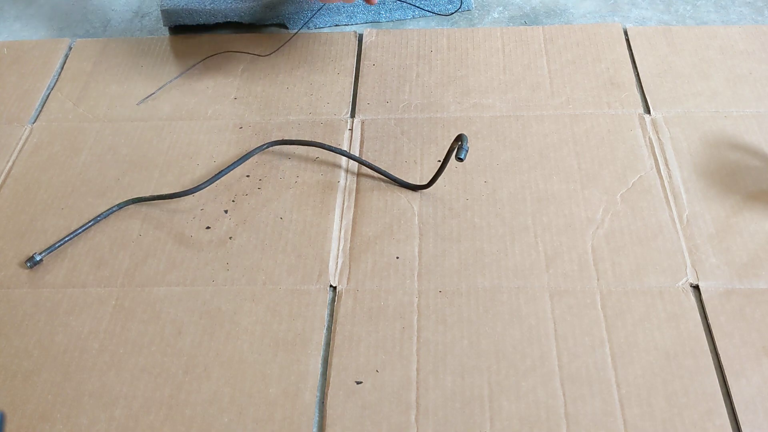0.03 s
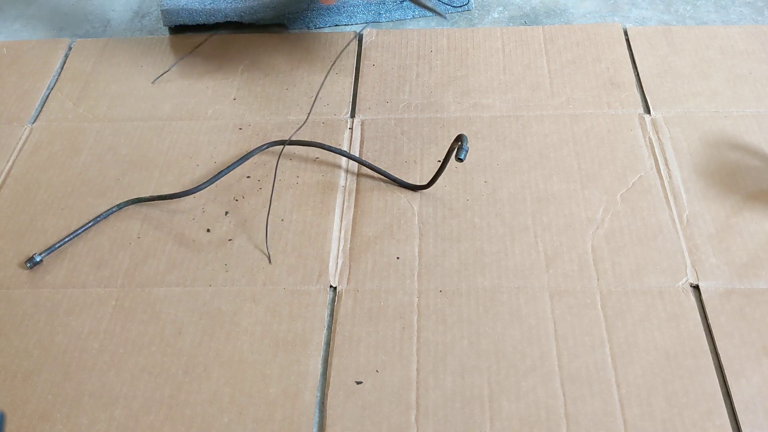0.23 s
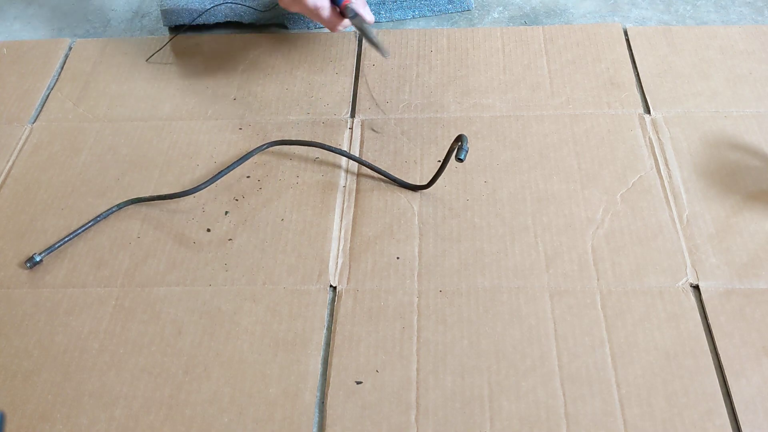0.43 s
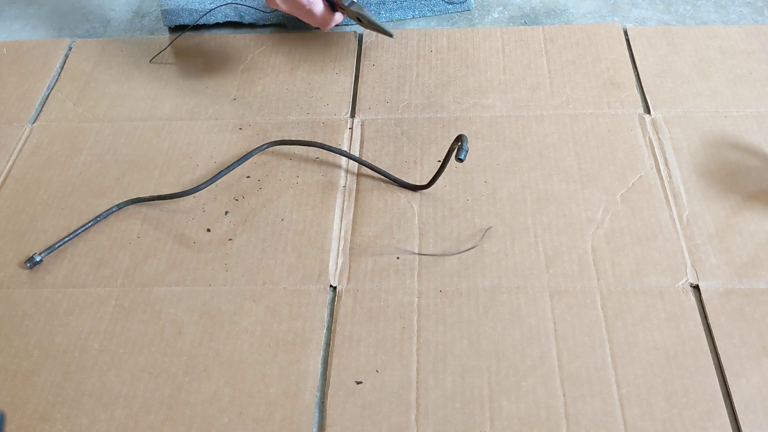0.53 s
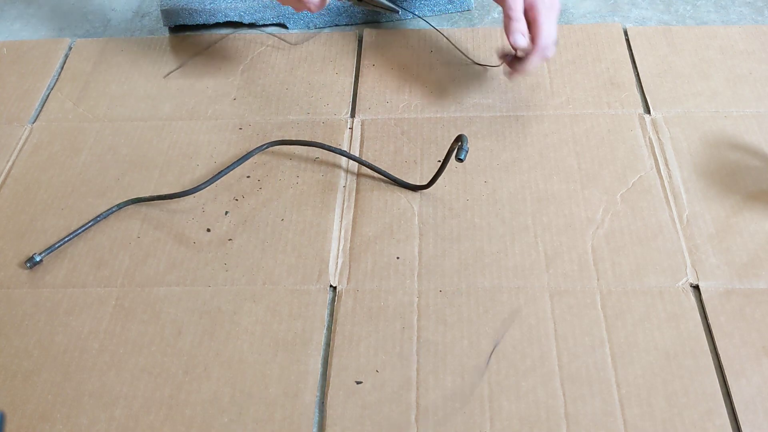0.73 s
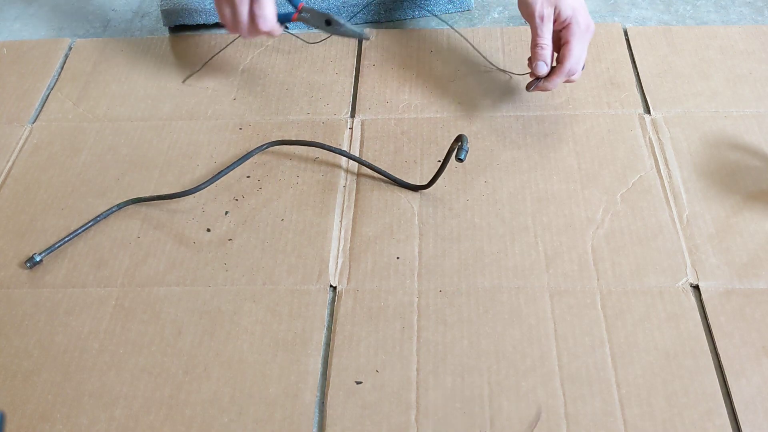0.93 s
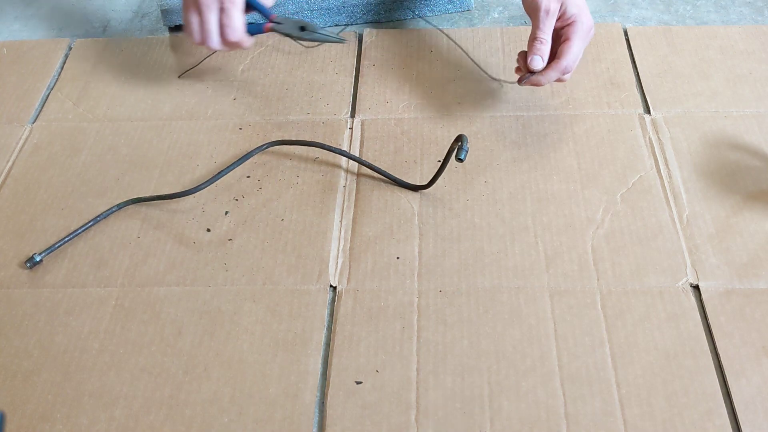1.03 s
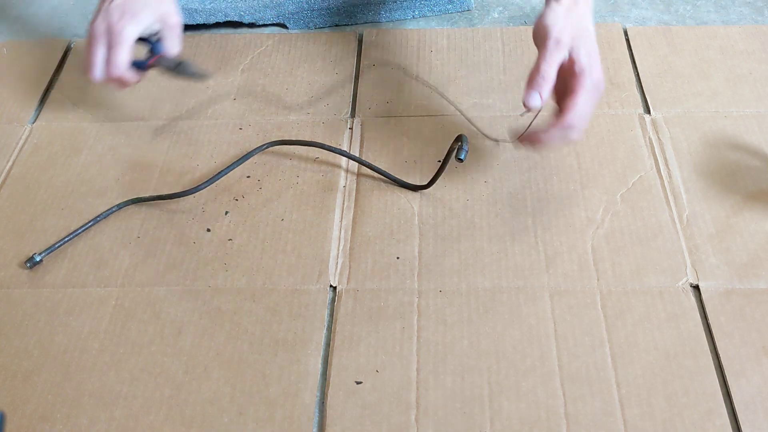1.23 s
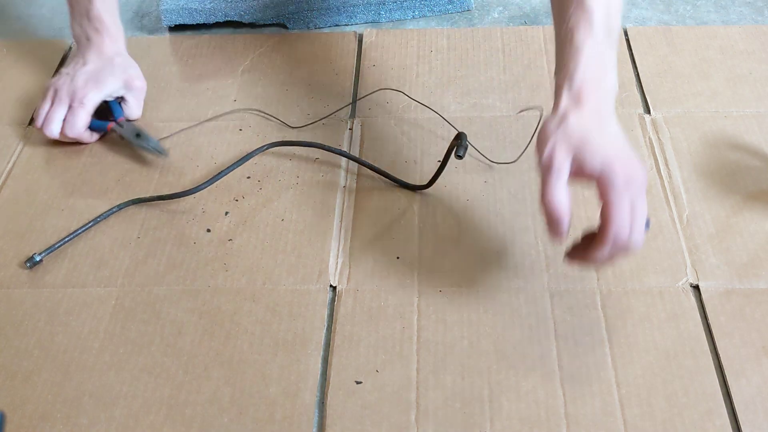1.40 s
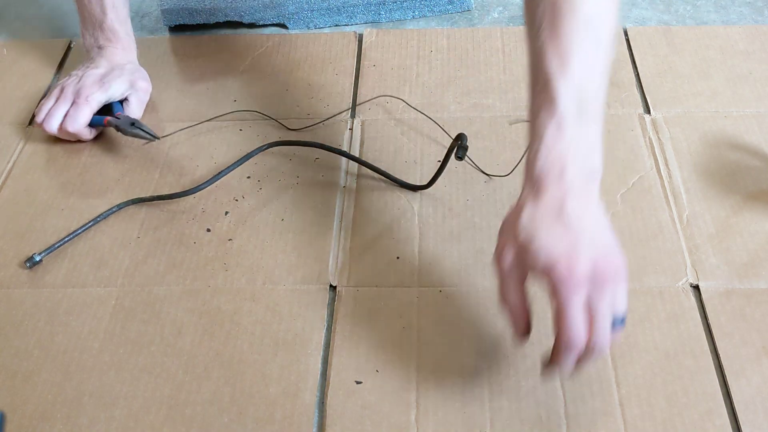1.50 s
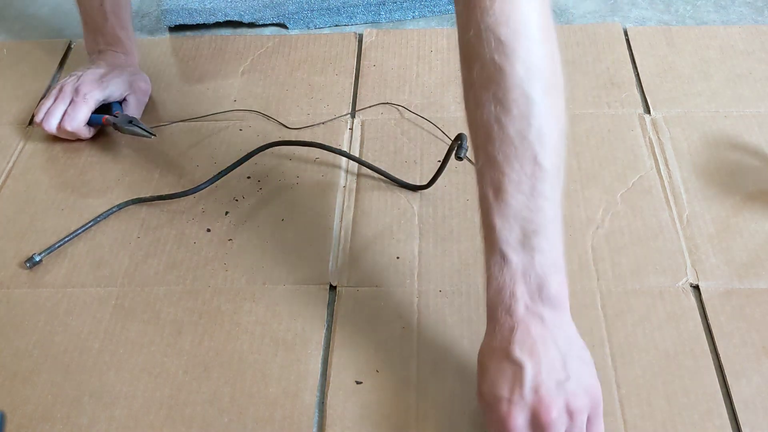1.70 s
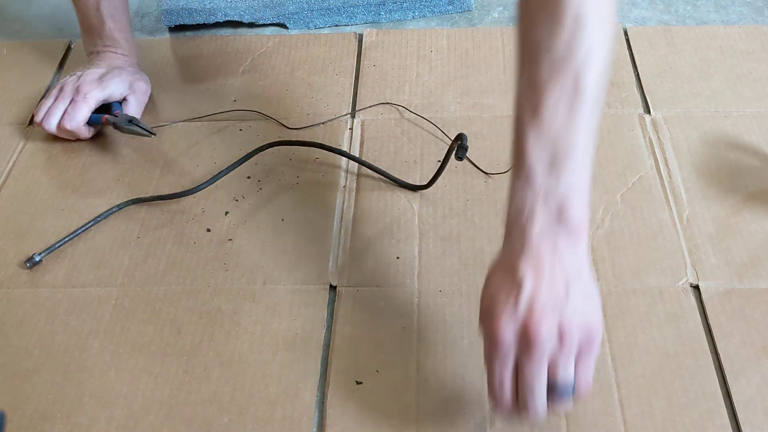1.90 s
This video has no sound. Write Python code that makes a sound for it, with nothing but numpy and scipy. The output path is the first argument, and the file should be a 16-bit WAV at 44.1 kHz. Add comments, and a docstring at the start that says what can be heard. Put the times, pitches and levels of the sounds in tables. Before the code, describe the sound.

Pliers snip thin wire with sharp snaps, then the wire chatters on cardboard.

```python
"""Pliers cutting steel wire

Pliers snap through thin steel wire over a sheet of cardboard, and the jaws and cardboard ring.
The loose wire pings, scrapes along the jaws and chatters on the cardboard as it is laid down.
Hands and sleeves rustle, weight shifts on the floor, and the hard workshop echoes over a faint hum."""
import sys
import numpy as np
from scipy import signal
from scipy.fft import rfft, irfft, next_fast_len
from scipy.io import wavfile

SR = 44100
rng = np.random.default_rng(int(sys.argv[2]) if len(sys.argv) > 2 else 0)


def output_pcm(signal):
    """Save a mono or channel-first signal as 16-bit PCM at the path in sys.argv[1].

    Samples are clipped to [-1, 1] before scaling.
    """
    pcm = np.clip(np.atleast_2d(signal).T, -1, 1) * 32767
    wavfile.write(sys.argv[1], SR, np.round(pcm).astype(np.int16))


N = 85995
T = np.arange(SR // 2) / SR  # half a second of time for one short sound


def amp(db):
    return 10 ** (np.asarray(db) / 20)


def unit(x):
    return x / np.sqrt(np.mean(x ** 2) + 1e-20)


def along(points, hz):
    """Read between (Hz, value) points on a log frequency scale."""
    freqs, values = np.transpose(points)
    return np.interp(np.log(hz + 1), np.log(freqs + 1), values)


def curve(rows):
    """A gain for every sample, from (seconds, dB) rows."""
    return amp(np.interp(np.arange(N) / SR, *np.transpose(rows)))


def swell(length):
    """A rounded rise and fall."""
    return np.sin(np.pi * np.clip(T / length, 0, 1))


def pan(db):
    """Make the left side db louder than the right."""
    return amp(np.array([[db], [-db]]) / 2)


def add(out, start, x):
    """Mix x in at start seconds."""
    i = max(0, round(start * SR))
    out[:, i:i + x.shape[-1]] += x[..., :N - i]


def filtered(x, gain):
    """Turn each frequency up or down by gain(hz)."""
    size = x.shape[-1]
    padded = next_fast_len(size + 8192)
    return irfft(rfft(x, padded) * gain(np.fft.rfftfreq(padded, 1 / SR)), padded)[..., :size]


# Each row: frequency in Hz, how alike left and right are (1 means the same).
STEREO_LIKENESS = [(100, 0.87), (500, 0.73), (1200, 0.72), (2200, 0.063), (5000, -0.32), (15000, -0.15)]
def noise(size, colour=None):
    """Stereo noise, nearly mono in the bass; a colour says how strong each frequency is."""
    def gain(hz):
        angle = np.arccos(np.clip(along(STEREO_LIKENESS, hz), -1, 1)) / 2
        return np.array([np.cos(angle), np.sin(angle)]) * (amp(along(colour, hz)) if colour else 1)
    mid, side = filtered(rng.standard_normal((2, size)), gain)
    return unit(np.array([mid + side, mid - side]))


def friction(size, colour, rate, depth_db, pitch=1):
    """Rubbing makes noise whose level jumps from slip to slip, rate times a second."""
    slips = np.interp(np.arange(size) * rate / SR, np.arange(size), rng.standard_normal(size))
    rough = noise(size) * amp(depth_db * slips)
    return unit(filtered(rough, lambda hz: amp(along(colour, hz / pitch))))


def contact(colour, thud_db, bright_db, scatter_db, t60, lag_s=0, pitch=1):
    """A sharp push, its echo off the floor and a scatter of noise that fades 60 dB in t60 seconds."""
    size = 2048
    hz = np.fft.rfftfreq(size, 1 / SR)
    bass = 1 / (1 + (hz / 950) ** 4)
    treble = 1 - 1 / (1 + (hz / 2300) ** 4)
    db = along(colour, hz / pitch) + thud_db * bass + bright_db * treble
    # Build a click of this colour with its energy right at the start (minimum phase).
    cepstrum = irfft(db * np.log(10) / 20)
    cepstrum[1:size // 2] *= 2
    cepstrum[size // 2 + 1:] = 0
    click = irfft(np.exp(rfft(cepstrum)))
    t = T[:2 * size]
    push = noise(len(t)) * amp(-60 * t / t60) * (1 - np.exp(-t / 0.00073))
    push *= amp(scatter_db) / np.sqrt(np.sum(push ** 2) / 2)
    echo_s = 0.0033 * (1 + 0.03 * rng.uniform(-1.2, 1))
    for ear, delay in enumerate([max(-lag_s, 0), max(lag_s, 0)]):
        push[ear, round(delay * SR)] += 1
        push[ear, round((delay + echo_s) * SR)] += amp(-6.5)
    hit = signal.fftconvolve(push, click[None], axes=1)[:, :len(t)]
    return hit / np.sqrt(np.mean(hit[:, :SR // 100] ** 2))  # the first 10 ms set the level


def ring(modes, spread=0.0036, damping=1, size=len(T)):
    """A struck object's fading tones, a little different each time; damping divides their fade times."""
    hz, db, t60 = np.transpose(modes)[:, :, None]
    louder, detune, phase_gap = rng.standard_normal((3, len(hz), 1))
    t = T[:size]
    fade = amp(db + 4.5 * louder - 60 * damping * t / t60) / np.linalg.norm(amp(db))
    phase = 2 * np.pi * hz * (1 + spread * detune) * t
    ears = [np.sum(fade * np.sin(phase + side * phase_gap / 2), 0) for side in (1, -1)]
    return np.sqrt(2) * np.array(ears)


# The workshop's echo. Each row: frequency in Hz, seconds to fade by 60 dB.
ROOM_FADE = [(100, 0.74), (400, 0.39), (1500, 0.45), (4000, .56), (9000, 0.47), (15000, 0.33)]
def room(x, db):
    """Hard walls add a smooth tail of echoes to the sound, at a level of db."""
    hz, t, spectrum = signal.stft(noise(len(T)), SR, nperseg=256)
    fade = amp(-60 * t / along(ROOM_FADE, hz)[:, None])
    tail = signal.istft(spectrum * fade, SR, nperseg=256)[1]
    tail = tail[:, :len(T)] * (1 - np.exp(-T / 0.0021))
    tail /= np.linalg.norm(tail[0])
    return x + amp(db) * signal.fftconvolve(x, tail, axes=1)[:, :x.shape[1]]


# The colour of the room's air. Each row: frequency in Hz, level in dB.
AIR_COLOUR = [(25, -27), (60, -1.5), (90, -1), (130, -14), (400, -19), (1500, -9), (5000, -37),
              (15000, -30.5)]
# The hum slowly grows. Each row: time in seconds, level in dB.
HUM_LEVEL = [(0, -76), (.7, -72.5), (1.4, -65.5), (1.95, -64)]
def air_and_hum():
    """Quiet room air lies under a faint hum at 91.5 Hz."""
    hum = curve(HUM_LEVEL) * np.sin(2 * np.pi * 91.5 * np.arange(N) / SR)
    return amp(-66) * noise(N, AIR_COLOUR) + hum


# Bumps on the floor. Each row: start in seconds, length in seconds, level in dB, pitch in Hz.
FLOOR_BUMPS = [(0.636, 0.099, -45, 64), (1.48, 0.16, -60, 142)]
# The rumble in a bump. Each row: frequency in Hz, level in dB.
RUMBLE_COLOUR = [(25, -17), (70, 3), (160, 3), (260, -28), (600, -36), (3000, -80)]
def floor_bumps():
    """Weight shifts on the floor, making soft low bumps."""
    out = np.zeros((2, N))
    for start, length, db, hz in FLOOR_BUMPS:
        bump = np.sin(2 * np.pi * hz * T) + amp(-9) * noise(len(T), RUMBLE_COLOUR)
        add(out, start, amp(db) * swell(length) ** 2 * bump)
    return out


# The rustle of hands and sleeves. Each row: time in seconds, level in dB.
SLEEVE_LEVEL = [(0, -48), (.1, -63), (.22, -67.5), (.38, -47), (.46, -60), (.5, -36.5), (.55, -43.5),
                (.6, -69), (.8, -58), (1.08, -47.5), (1.19, -54), (1.26, -47.5), (1.34, -51), (1.44, -41),
                (1.63, -59), (1.7, -47.5), (1.77, -53.5), (1.85, -63), (1.95, -63.5)]
# Quick brushes. Each row: start in seconds, fade time in seconds, level in dB, extra thud in dB.
SLEEVE_BRUSHES = [(1.2244, 0.06, -29, -23), (1.297, .05, -42.5, -0.5), (1.31, .07, -38, 8)]
# The colours of the rustle and of a brush. Each row: frequency in Hz, level in dB.
SLEEVE_COLOUR = [(100, -24), (500, -11.5), (1500, -6), (3500, -1), (7000, -1.5), (10500, -7.5), (14500, -2)]
SLEEVE_BRUSH_COLOUR = [(100, -18), (500, -2.5), (1500, -4.5), (3700, 3), (6000, -0.5), (10000, -5),
                       (14500, -4)]
def hands_and_sleeves():
    """Skin and cloth rub in an uneven rustle, with a few quick brushes."""
    out = curve(SLEEVE_LEVEL) * friction(N, SLEEVE_COLOUR, rate=370, depth_db=6)
    for start, length, db, thud_db in SLEEVE_BRUSHES:
        brush = contact(SLEEVE_BRUSH_COLOUR, thud_db, bright_db=0, scatter_db=30, t60=length)
        add(out, start, amp(db) * brush)
    return room(out, db=-10)


# Wire sliding on cardboard. Each row: time in seconds, level in dB.
SLIDE_LEVEL = [(0, -40.5), (.08, -56.5), (.2, -70), (1.32, -70), (1.38, -40), (1.45, -31.5), (1.55, -41.5),
               (1.7, -45.5), (1.78, -51.5), (1.81, -76), (1.95, -67)]
# Scrapes on the jaws. Each row: start in seconds, length in seconds, level in dB, pitch in Hz.
JAW_SCRAPES = [(0, 0.038, -39.5, 1880), (.416, 0.02, -27, 1560), (.417, .016, -36, 2730),
               (0.472, 0.012, -29.5, 1640), (0.48, 0.016, -24, 1680), (.493, 0.02, -27.5, 1700),
               (0.507, 0.014, -25, 1800), (.52, 0.02, -44, 1730), (0.646, 0.045, -32, 2110),
               (0.784, 0.097, -35, 1700), (0.868, 0.013, -22, 1730), (.886, 0.038, -31, 2400),
               (0.983, 0.058, -49, 1570), (1.115, 0.051, -36.5, 1470), (1.221, 0.038, -43.5, 1440),
               (1.499, 0.024, -32, 1440)]
# The colours of the slide and of a scrape pitched at 1643 Hz. Each row: frequency in Hz, level in dB.
SLIDE_COLOUR = [(40, -52), (180, -16), (400, -25), (800, -6.5), (1200, 0), (1800, -1.5), (2700, -2.5),
                (4000, -17), (9000, -28.5), (15000, -26)]
JAW_SCRAPE_COLOUR = [(100, -83), (400, -43), (900, -29), (1400, -12), (1650, 2), (2000, -12), (2400, -16),
                     (2900, -14), (4500, -36), (10000, -36), (14000, -30)]
def wire_rubbing():
    """The wire drags over the cardboard and scrapes through the jaws."""
    out = curve(SLIDE_LEVEL) * friction(N, SLIDE_COLOUR, rate=400, depth_db=4)
    for start, length, db, hz in JAW_SCRAPES:
        scrape = friction(len(T), JAW_SCRAPE_COLOUR, rate=440, depth_db=-0.5, pitch=hz / 1643)
        add(out, start, amp(db) * swell(length) * scrape)
    return room(out, db=-10)


# Taps. Each row: start in seconds, level in dB, extra thud in dB, extra treble in dB, pitch in Hz.
WIRE_TAPS = [(.003, -36.5, -14, 2, 1550), (.06, -50, 8, 23, 1360), (0.122, -50.5, -7, 2, 1410),
             (.305, -21, -5, -3, 1540), (.855, -27, 8, 10.5, 1560), (0.8654, -20, 4, 0.5, 1686),
             (0.96, -26, -8.5, 2, 1450), (.967, -30.5, 1, 11.5, 1484), (1.12, -42.5, -4, 5, 1570),
             (1.131, -42, 12.5, -10, 1500), (1.34, -31, -9, 2, 1450), (1.347, -32.5, -2, -1, 1420),
             (1.361, -28.5, -0.5, 5, 1450), (1.372, -25, 0, -0.5, 1530), (1.377, -26.5, -4, 0, 1480),
             (1.383, -26, -14, -7, 1410), (1.394, -29, -12, -7, 1320), (1.4006, -24.5, -3, 3, 1260),
             (1.415, -30.5, 4, -3, 1280), (1.426, -33, 6, 17.5, 1450), (1.505, -24.5, -5, -1, 1425),
             (1.515, -27.5, -0.5, 0, 1430), (1.574, -24, -4, 1.5, 1490), (1.579, -27, -2.5, -0.5, 1480),
             (1.587, -33, 3.5, 12, 1440), (1.63, -34.5, 5, 3, 1500), (1.638, -33, 2.5, -10, 1540),
             (1.66, -37, 2, -10, 1210), (1.673, -30, -1, -5, 1370), (1.69, -33, -2, 1.5, 1190),
             (1.702, -37, 3, -5, 1300), (1.755, -39.5, 3.5, -9, 1240), (1.765, -38.5, 3.5, 2, 1300),
             (1.851, -48.5, 3, -9, 1290), (1.894, -56, 12, 14, 1300)]
# The colour of a tap pitched at 1440 Hz. Each row: frequency in Hz, level in dB.
WIRE_TAP_COLOUR = [(40, -64), (130, -33.5), (300, -27.5), (600, -14.5), (950, -14), (1300, 3), (1700, -1.5),
                   (2200, -11), (3300, -19), (5000, -30.5), (10000, -36), (15000, -31.5)]
# The cardboard's tones. Each row: pitch in Hz, level in dB, fade time in seconds before damping.
CARDBOARD_TONES = [(344, -17.5, 0.26), (626, -19, 0.5), (773, -16.5, 0.44), (831.8, -3, 0.21),
                   (1081, -13, 0.42), (1273, -12.5, 0.63), (1359, -2.5, 0.38), (1497, -3, .3),
                   (1701, -7.5, .3), (1940, -9.5, 0.41)]
def wire_taps():
    """The wire chatters on the cardboard, lower in pitch as more of it lies down."""
    out = np.zeros((2, N))
    for start, db, thud_db, bright_db, hz in WIRE_TAPS:
        tap = contact(WIRE_TAP_COLOUR, thud_db, bright_db,
                      scatter_db=4, t60=0.03, lag_s=0.00003, pitch=hz / 1440)
        cardboard = amp(-16.5) * ring(CARDBOARD_TONES, spread=0.041, damping=2.8, size=tap.shape[1])
        add(out, start, amp(db) * (tap + cardboard))
    return room(out, db=-6)


# Pings. Each row: start in seconds, level in dB, ring next to the tick in dB, tick fade in seconds.
WIRE_PINGS = [(0.527, -34, -4, 0.081), (0.966, -31.5, -31, 0.014), (0.996, -28.5, -8, 0.096),
              (1.218, -33.5, -10, 0.036), (1.359, -40, -14, 0.013), (1.401, -33.5, -14, .04),
              (1.449, -44, -10, 0.26), (1.768, -48.5, -16, .15)]
# The tick that starts a ping. Each row: frequency in Hz, level in dB.
TICK_COLOUR = [(500, -35), (3000, -20), (9000, -17.5), (11500, -13), (13000, -1), (15500, -1.5)]
# The wire's tones. Each row: pitch in Hz, level in dB, fade time in seconds before damping.
WIRE_TONES = [(12400, -10, 0.29), (13000, -7, 0.33), (13700, 0, .22), (14060, -8, 0.36), (15050, 0, .27),
              (15540, 1, 0.2)]
def wire_pings():
    """The wire springs free with a tick and a very high ring."""
    out = np.zeros((2, N))
    for start, db, ring_db, fade_s in WIRE_PINGS:
        ping = amp(ring_db) * ring(WIRE_TONES, spread=0.0038, damping=2.4)
        add(ping, 0, contact(TICK_COLOUR, thud_db=0, bright_db=0, scatter_db=22, t60=fade_s))
        add(out, start, amp(db) * ping * pan(db=-5))
    return room(out, db=-5)


# Snaps of the pliers. Each row: start in seconds, then in dB: level, cardboard thud,
# extra treble, left over right, room echo, ring of the jaws.
PLIER_SNAPS = [(0.2459, -13.5, 0, -5.5, -2, -6, -46), (0.2584, -15.5, 3, -2.5, -2.5, -4.5, -18),
               (.638, -28, -9.5, 6.5, -3, -6.5, -7), (.7273, -17, -10.5, 1.5, 7.5, -4, -15),
               (0.8803, -22, -22.5, 2.5, 1.5, -7.5, -8)]
# The crack of a snap. Each row: frequency in Hz, level in dB.
CRACK_COLOUR = [(40, -54), (130, -45.5), (300, -28.5), (600, -12), (850, -6.5), (1100, -5), (1500, 1.5),
                (2200, -7.5), (3200, -9), (5000, -17), (10000, -25), (15000, -22.5)]
# The jaws' tones. Each row: pitch in Hz, level in dB, seconds to fade by 60 dB.
JAW_TONES = [(1656, 2, 0.4), (2105, -11.5, 0.51), (2377, 0.5, 0.28), (2650, -6.5, 0.34), (3074, -10, 0.35),
             (3357, -11, .25)]
def pliers():
    """Each snap rings the jaws; the harder it thuds, the more the cardboard rings too."""
    out = np.zeros((2, N))
    for start, db, thud_db, bright_db, pan_db, room_db, jaws_db in PLIER_SNAPS:
        snap = amp(jaws_db) * ring(JAW_TONES) + amp(thud_db - 11) * ring(CARDBOARD_TONES)
        crack = contact(CRACK_COLOUR, thud_db, bright_db, scatter_db=5, t60=0.046, lag_s=-0.00005)
        add(snap, 0, crack)
        sideways = snap * (pan(pan_db) - 1)  # moves the snap to one side but not its room echo
        add(out, start, amp(db) * (room(snap, room_db) + sideways))
    return out


def scene():
    """Mix it all; snaps, taps and pings are cut below 185 Hz."""
    low_cut = signal.butter(2, 185, "highpass", fs=SR, output="sos")
    contacts = signal.sosfilt(low_cut, pliers() + wire_taps() + wire_pings())
    return contacts + wire_rubbing() + hands_and_sleeves() + air_and_hum() + floor_bumps()


# The balance of the microphones. Each row: frequency in Hz, left over right in dB.
MIC_BALANCE = [(100, -0.5), (2000, 1), (5000, 0.5), (9000, -2.5), (14000, -4.5)]
def record(dry):
    """The right microphone is brighter; peaks stop at full scale and nothing above 15900 Hz is kept."""
    tilted = filtered(dry, lambda hz: amp(np.outer([1, -1], along(MIC_BALANCE, hz)) / 2))
    return filtered(np.clip(tilted, -1, 1), lambda hz: hz < 15900)


dry = scene()
out = record(dry)
output_pcm(out)
```